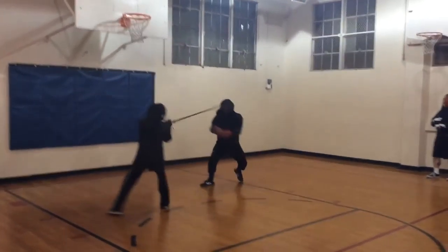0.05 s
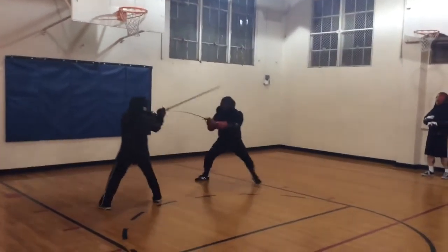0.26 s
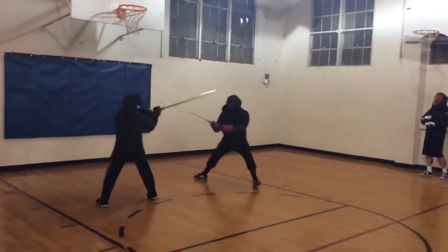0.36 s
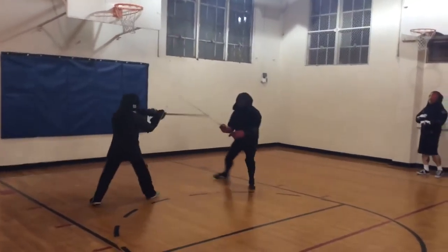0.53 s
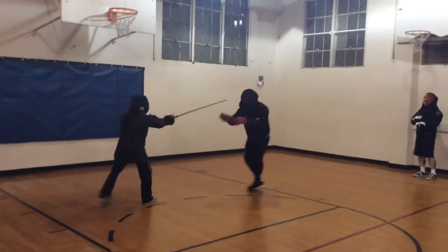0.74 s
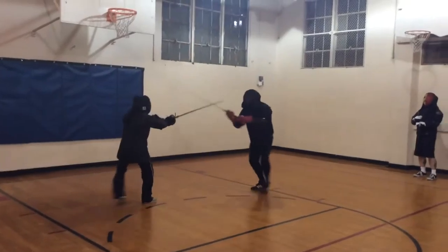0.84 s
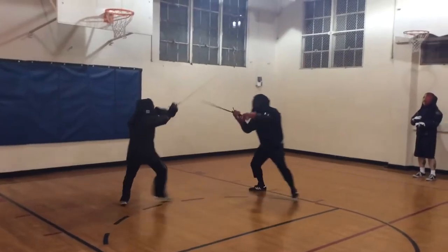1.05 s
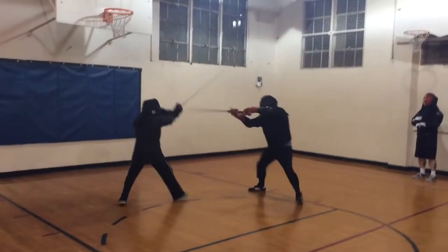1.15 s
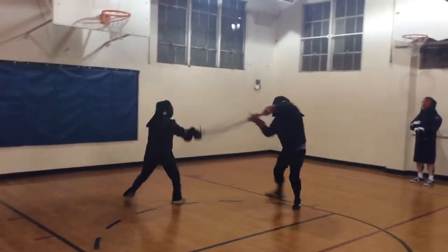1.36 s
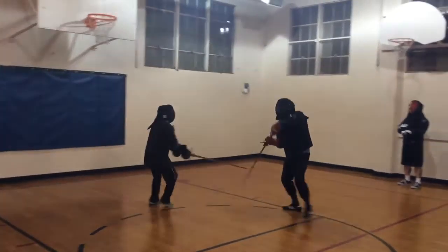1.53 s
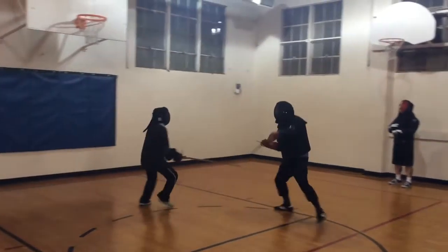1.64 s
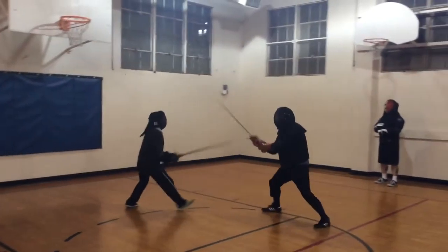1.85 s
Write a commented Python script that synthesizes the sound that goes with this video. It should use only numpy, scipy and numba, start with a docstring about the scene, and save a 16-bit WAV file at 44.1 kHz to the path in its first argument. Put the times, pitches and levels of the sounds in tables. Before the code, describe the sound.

Sword blades clang together three main times in a reverberant hall, a dull padding blow and footfalls between

```python
"""Sword sparring in a gym

Two fencers spar with steel swords in a hard-walled gym, some metres from a phone.
Clashes are noise bursts plus decaying blade modes; a few long rings are sines that swell and dip.
Feet thump the sprung floor (damped modes), one blow slaps padding (burst plus damped modes).
The hall convolves them with scattered echoes and a long noise tail, over ventilation rumble (coloured noise)."""
import sys
import numpy as np
from scipy import signal
from scipy.fft import rfft, irfft, next_fast_len
from scipy.io import wavfile
from scipy.ndimage import uniform_filter1d
from numba import njit

SR = 44100
rng = np.random.default_rng(int(sys.argv[2]) if len(sys.argv) > 2 else 0)


def master_out(mix):
    """Clip the mix to full scale and print it as 16-bit PCM to the path in sys.argv[1]."""
    frames = np.transpose(np.atleast_2d(mix))
    ceiling = np.clip(frames, -1, 1)
    pcm = np.round(ceiling * 32767).astype(np.int16)
    wavfile.write(sys.argv[1], SR, pcm)


N = 83790
SIZE = next_fast_len(2 * N)
FREQ_HZ = np.maximum(np.arange(SIZE // 2 + 1) * SR / SIZE, 1.)
TIME_S = np.arange(N) / SR

# Ventilation spectrum. Each row: frequency in Hz, relative density in dB per Hz.
AIR_SPECTRUM = [(30, -22), (60, -19), (110, 1), (160, -5), (350, -5), (500, -9.5), (700, -12), (1500, -12),
                (3000, -14.5), (6000, -29), (15000, -39)]
# Blade clashes. Each row: start in seconds, crack level in dB, its lift below 1 kHz in dB, its lift above
# 5 kHz in dB, contact decay in seconds, first blade in dB, second blade in dB, near wall echoes in dB,
# far wall echo in dB, brightest spot in Hz, lift of that spot in dB.
CLASHES = [(0.1711, -2.5, -11, 2, 0.011, -22, -45, -15, 4, 2900, 6.5),
           (0.7575, -1, -7.5, 0.5, 0.0061, -27.5, -26, 2, 1.5, 2070, 3.5),
           (1.3594, -5, -7, 2, 0.0024, -29, -29.5, -4.5, -10, 2080, 25.5),
           (1.444, -11.5, -10, -0.5, 0.0071, -25, -32.5, 5.5, -3, 2240, 4),
           (1.4635, -12, -16, -2.5, 0.0031, -39, -44, 4, -9, 6370, 26.5),
           (1.534, -18, -73, 0, 0.011, -47, -46, 0, -2, 7300, 1)]
# Blade mode pitches. Each entry: frequency in Hz.
FIRST_BLADE_HZ = 674, 1375, 2150, 2406, 3016, 3698, 4433, 5329, 5760, 5975, 7125, 8080, 11680, 15140
SECOND_BLADE_HZ = 1870, 2070, 2205, 2435, 2681, 3270, 3753, 4100, 5640, 6755, 7714, 9060
# Blade modes, in pitch order. Each row: relative level in dB, t60 in seconds.
FIRST_BLADE_MODES = [(-8, 0.25), (-18, 0.055), (-16.5, 0.29), (-10, 0.26), (1, 0.094), (-3.5, 0.067),
                     (0, 0.3), (-8, 0.45), (1, 0.17), (-19, .15), (-2, 0.6), (-21, .07), (-6, 0.13),
                     (6, 0.14)]
SECOND_BLADE_MODES = [(-6.5, 0.32), (-2, .1), (-15, 0.3), (3, 0.42), (-3.5, 0.71), (-4, .2), (-4, 0.23),
                      (-4, 0.13), (-20, 0.18), (-16, .15), (-12, 0.23), (2, 0.029)]
# Contact noise spectrum. Each row: frequency in Hz, relative density in dB per Hz.
CRACK_SPECTRUM = [(100, -50), (300, -22), (600, 6), (1200, -2), (2000, 2.5), (3000, 2.5), (4800, 0.5),
                  (6500, 3.5), (7500, 0.5), (8500, 3), (11000, -2), (15000, 2)]
# Long ring pitches. Each entry: frequency in Hz.
LONG_RING_HZ = 3017, 3292, 2681
# Long ring levels as the blades turn. Each row: time in seconds, then RMS level in dB of the
# 3.0 kHz, 3.3 kHz and 2.7 kHz rings.
LONG_RING_LEVELS = [(0, -92, -91, -73), (0.168, -70, -53, -75), (0.182, -21.5, -57, -60),
                    (0.27, -17.5, -57, -50), (0.34, -40, -60, -46), (0.4, -24, -62, -55),
                    (0.47, -37, -66, -56), (0.6, -48, -79, -48), (0.72, -42, -73, -52),
                    (0.802, -64, -47, -39), (0.888, -55, -53, -22), (1.05, -40, -42, -41.5),
                    (1.15, -47, -45, -40.5), (1.26, -48, -38.5, -55), (1.302, -60, -65, -43),
                    (1.45, -45, -71, -62), (1.6, -61, -33, -62), (1.7, -36.5, -59, -57),
                    (1.8, -33, -71, -49), (1.9, -37.5, -55, -65)]
# Footfalls. Each row: start in seconds, level in dB.
STEPS = [(0.188, -28), (0.47, -35.5), (0.778, -31.5), (1.227, -34.5), (1.302, -35), (1.798, -48),
         (1.858, -34.5)]
# Floor board modes. Each row: frequency in Hz, relative level in dB, t60 in seconds.
BOARD_MODES = [(130.7, -5, 0.48), (179.3, -8, 0.36), (240, -26, 0.3), (340, -8, 0.16)]
# Blows on padding. Each row: start in seconds, level in dB, crack lift above 5 kHz in dB.
PAD_HITS = [(1.2786, -5, -13)]
# Padded body modes. Each row: frequency in Hz, relative level in dB, t60 in seconds.
PAD_MODES = [(470, -6.5, 0.24), (538, 0, 0.09), (634, 1, 0.073), (690, -5, 0.091), (729, -24, 0.21),
             (970, -6.5, 0.052), (191, -19, 0.084)]
# Hall decay. Each row: frequency in Hz, t60 in seconds.
HALL_T60 = [(100, 1.3), (300, 0.74), (700, 1.15), (1800, 1.13), (3000, 1.27), (5000, 0.96), (8000, 0.63),
            (12800, 0.48), (16000, 0.15)]
# Wall echoes. Each row: delay in seconds, level in dB, smear in seconds.
ECHOES = [(.016, 2.5, 0.0044), (0.036, -1, 0.003), (.064, -1, 0.008), (0.114, 2.5, 0.021)]

AIR_RMS_DB = -45.5
MODE_SCATTER_DB, BLADE_TO_HALL_DB = 2.5, -6
FLUTTER_KNOTS_HZ, FLUTTER_DB = 30.45, 5  # a swung, flexing blade turns its ring to and from the listener
CRACK_RISE_S, SPOT_WIDTH_OCTAVES = .0022, .12
CLANG_DB, CLANG_STEP_HZ = 3, 90  # countless quickly damped modes make each blow's colour uneven
STEP_SMOOTH_S = 0.00055
PAD_RING_DB, PAD_CONTACT_S = -18, 0.0043
FAR_WALL_S = .08  # later echoes take the far wall level
TAIL_DB, TAIL_RISE_S = 10, 0.004
SPARSE_DB, SPARSE_S = 3, .04  # single reflections stand out before the tail grows dense
MIC_LOW_HZ, TOP_HZ = 103, 15450
THRESHOLD_DB, RATIO, GRAB_S, LET_GO_S = -23, 1.162, 0.002, 0.15
HEADROOM = 1.1


def undb(db):
    """Decibels to amplitude factor."""
    return 10 ** (np.asarray(db) / 20)


def read_log_hz(table, hz):
    """Table interpolated on a log-frequency axis."""
    a = np.array(table, float)
    return np.interp(np.log(hz), np.log(a[:, 0]), a[:, 1])


def colour(x, db):
    """Zero-phase filter with the given gain per bin."""
    return irfft(rfft(x, SIZE) * undb(db), SIZE)[:N]


def noise_curve(at, knots):
    """Unit Gaussian values at the knots, joined by straight lines."""
    return np.interp(at, knots, rng.standard_normal(len(knots)))


def air():
    """Ventilation rumble and steady hush: noise with a fixed spectrum."""
    x = colour(rng.standard_normal(N), read_log_hz(AIR_SPECTRUM, FREQ_HZ))
    return x * undb(AIR_RMS_DB) / np.sqrt(np.mean(x ** 2))


def ring(modes, start_s, level_db, flutter_db=0.):
    """Damped modes: decaying sines, each with its own strength, slight detuning and level flutter."""
    t = np.maximum(TIME_S - start_s, 0)
    draws = rng.standard_normal((len(modes), 2))
    knots_s = np.arange(0, TIME_S[-1] + .1, 1 / FLUTTER_KNOTS_HZ)
    out = np.zeros(N)
    for (hz, mode_db, t60_s), (strength, detune) in zip(modes, draws):
        gain_db = level_db + mode_db + MODE_SCATTER_DB * strength
        gain_db = gain_db + flutter_db * noise_curve(TIME_S, knots_s)
        decay = np.exp(-np.log(1000) * t / t60_s)
        out += undb(gain_db) * decay * np.sin(2 * np.pi * hz * (1 + 0.00017 * detune) * t)
    return (TIME_S > start_s) * out


def crack(start_s, decay_s, level_db, low_db, high_db, spot_hz, spot_db):
    """Contact noise burst, and the unevenly coloured click that feeds the hall."""
    t = np.maximum(TIME_S - start_s, 0)
    shape = (1 - np.exp(-t / CRACK_RISE_S)) * np.exp(-t / max(decay_s, 1e-3))
    tilt = [(800, low_db), (1500, 0.0057), (3500, 0), (6000, high_db)]
    tone_db = level_db + read_log_hz(CRACK_SPECTRUM, FREQ_HZ) + read_log_hz(tilt, FREQ_HZ)
    clang_db = CLANG_DB * noise_curve(FREQ_HZ, np.arange(0, SR / 2 + CLANG_STEP_HZ, CLANG_STEP_HZ))
    lift_db = spot_db * np.exp(-(np.log2(FREQ_HZ / spot_hz) / SPOT_WIDTH_OCTAVES) ** 2)
    # one sample with the burst envelope's energy
    impulse = np.sqrt(np.sum(shape ** 2)) * (np.arange(N) == int((start_s + CRACK_RISE_S) * SR))
    burst = colour(rng.standard_normal(N) * shape, tone_db + lift_db)
    click = colour(impulse, tone_db + clang_db + lift_db / 2)
    return burst, np.where(TIME_S > start_s, click, 0)


def hall(x, wet_db, near_db=0., far_db=0.):
    """Convolution with smeared wall echoes and a diffuse tail, decaying at a rate set per band."""
    shape = (1 - np.exp(-TIME_S / TAIL_RISE_S)) * undb(TAIL_DB) / np.sqrt(SR / 10)
    for delay_s, db, smear_s in ECHOES:
        late = np.maximum(TIME_S - delay_s, 0) / smear_s
        wall_db = far_db if delay_s > FAR_WALL_S else near_db
        echo = undb(db + wall_db) * late * np.exp(-late) * 2 / np.sqrt(smear_s * SR)
        shape = np.hypot(shape, echo)
    noise, tail = rfft(rng.standard_normal(N), SIZE), np.zeros(N)
    for hz in 50 * 2 ** np.arange(0, 8.6, .5):  # overlapping half-octave bands
        weight = np.clip(1 - np.abs(np.log2(FREQ_HZ / hz)) * 2, 0, 1)
        band = irfft(noise * weight, SIZE)[:N]
        tail += band * np.exp(-np.log(1000) * TIME_S / read_log_hz(HALL_T60, hz))
    sparse_db = SPARSE_DB * np.exp(-TIME_S / SPARSE_S) * noise_curve(TIME_S, TIME_S[::44])
    response = tail * shape * undb(sparse_db)
    return undb(wet_db) * irfft(rfft(x, SIZE) * rfft(response, SIZE), SIZE)[:N]


def clashes():
    """Steel on steel: each contact cracks and sets both blades' modes ringing."""
    first = [(hz, *mode) for hz, mode in zip(FIRST_BLADE_HZ, FIRST_BLADE_MODES)]
    second = [(hz, *mode) for hz, mode in zip(SECOND_BLADE_HZ, SECOND_BLADE_MODES)]
    out = np.zeros(N)
    for (start_s, crack_db, low_db, high_db, decay_s, first_db, second_db,
         near_db, far_db, spot_hz, spot_db) in CLASHES:
        blades = ring(first, start_s, first_db, FLUTTER_DB) + ring(second, start_s, second_db, FLUTTER_DB)
        burst, click = crack(start_s, decay_s, crack_db, low_db, high_db, spot_hz, spot_db)
        out += burst + blades + hall(click + undb(BLADE_TO_HALL_DB) * blades, 0, near_db, far_db)
    return out


def long_rings():
    """Sustained blade modes: sines that swell and dip as the blades turn."""
    levels = np.array(LONG_RING_LEVELS)
    out = np.zeros(N)
    for k, hz in enumerate(LONG_RING_HZ):
        rms = undb(np.interp(TIME_S, levels[:, 0], levels[:, k + 1]))
        out += np.sqrt(2) * rms * np.sin(2 * np.pi * hz * TIME_S + 2 * np.pi * rng.random())
    return out


def feet():
    """Footfalls ring the floor boards; a short moving average softens each push."""
    boards = sum(ring(BOARD_MODES, start_s, db) for start_s, db in STEPS)
    thumps = uniform_filter1d(boards, max(int(STEP_SMOOTH_S * SR), 1))
    return thumps + hall(thumps, -15.5)


def padding():
    """Dull slap on a padded jacket: contact noise plus damped body modes."""
    out = np.zeros(N)
    for start_s, db, high_db in PAD_HITS:
        body = ring(PAD_MODES, start_s, db + PAD_RING_DB)
        burst, click = crack(start_s, PAD_CONTACT_S, db, 3.5, high_db, 450, 4.8)
        out += body + burst + hall(click + undb(-5.5) * body, 0, -1.5, -1.5)
    return out


def scene():
    """Sum of all sources, one channel."""
    return (clashes() + long_rings() + padding() + feet() + air())[None]


@njit
def follow(x, grab, let_go):
    """Level follower, quick up and slow down."""
    level, out = 0., np.empty(len(x))
    for i in range(len(x)):
        size = abs(x[i])
        level += (size - level) * (grab if size > level else let_go)
        out[i] = level
    return out


def record(dry):
    """The phone drops deep bass, turns loud passages down, rounds the peaks and cuts the top."""
    dry = signal.sosfilt(signal.butter(3, MIC_LOW_HZ, "high", fs=SR, output="sos"), dry)
    level = follow(dry[0], 1 / (GRAB_S * SR), 1 / (LET_GO_S * SR))
    threshold = undb(THRESHOLD_DB)
    gain = (threshold / np.maximum(level, threshold)) ** (1 - 1 / max(RATIO, 1))
    rounded = HEADROOM * np.tanh(dry * gain / HEADROOM)
    return signal.sosfilt(signal.ellip(10, .2, 70, TOP_HZ, fs=SR, output="sos"), rounded)


dry = scene()
out = record(dry)
master_out(out)
```